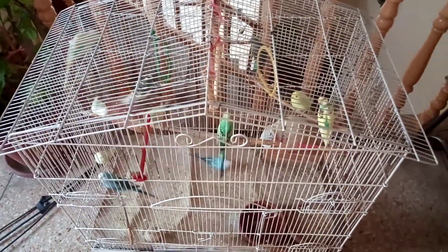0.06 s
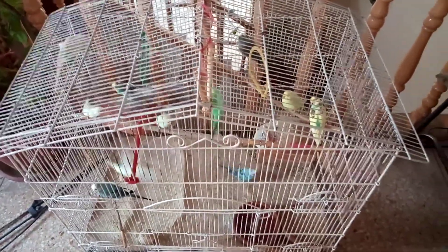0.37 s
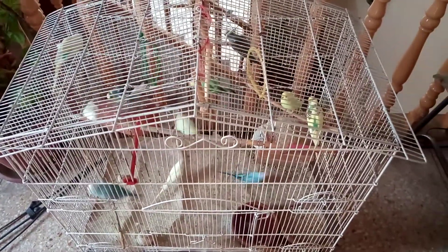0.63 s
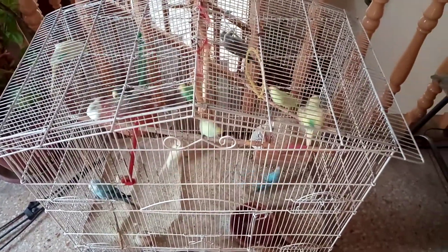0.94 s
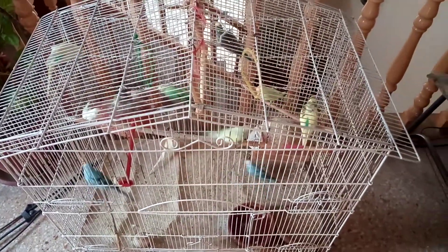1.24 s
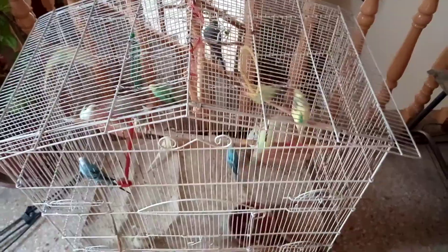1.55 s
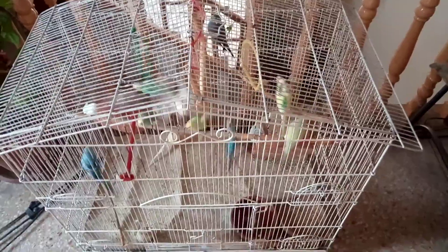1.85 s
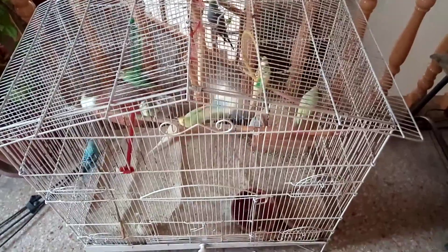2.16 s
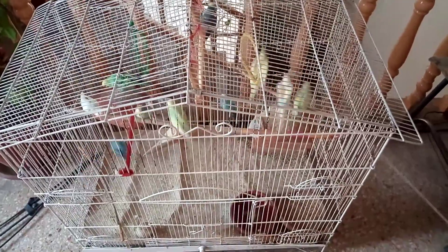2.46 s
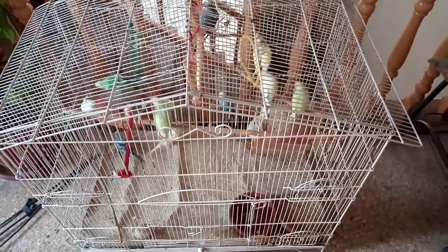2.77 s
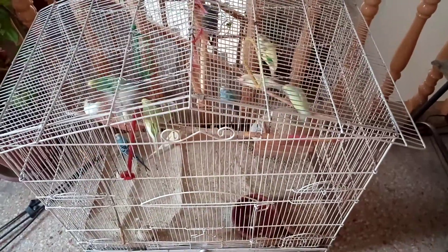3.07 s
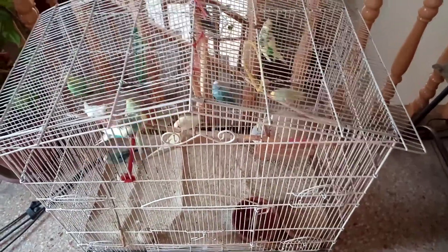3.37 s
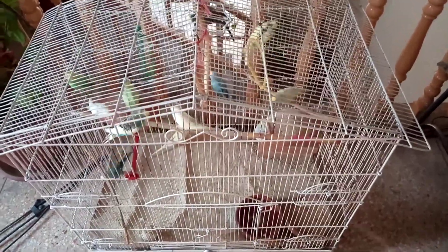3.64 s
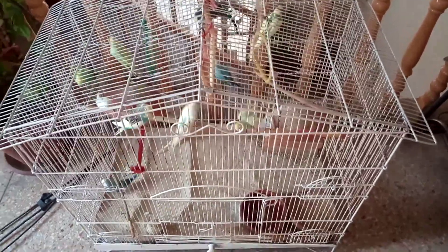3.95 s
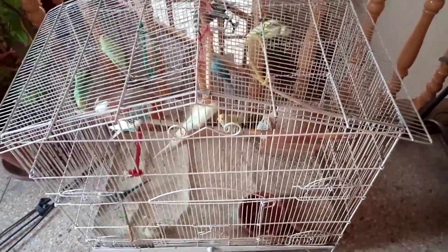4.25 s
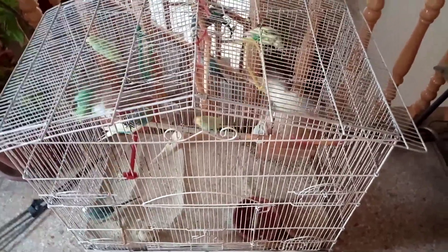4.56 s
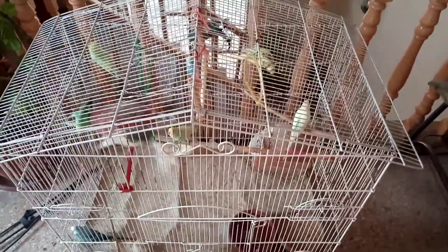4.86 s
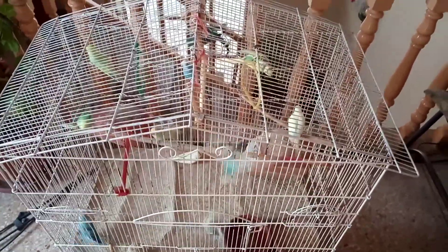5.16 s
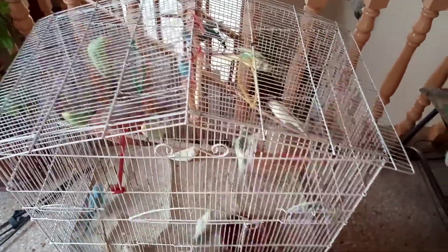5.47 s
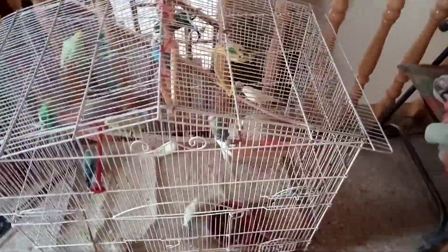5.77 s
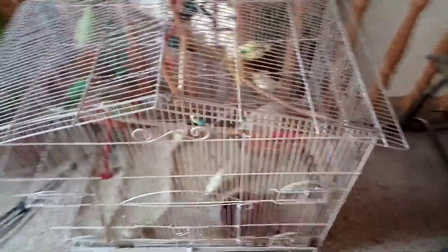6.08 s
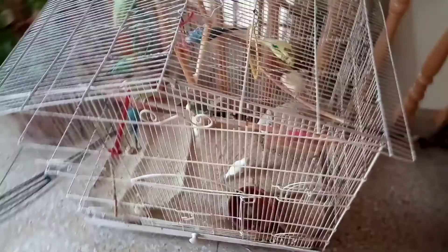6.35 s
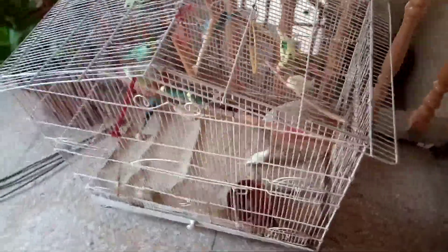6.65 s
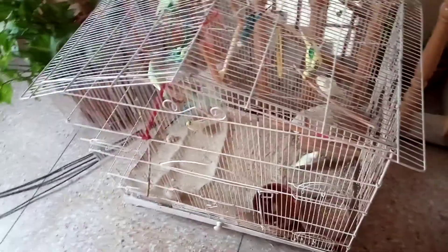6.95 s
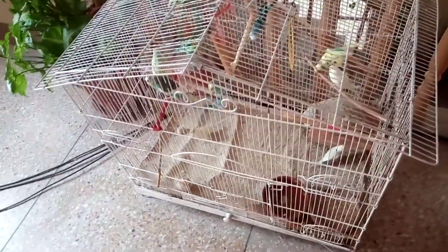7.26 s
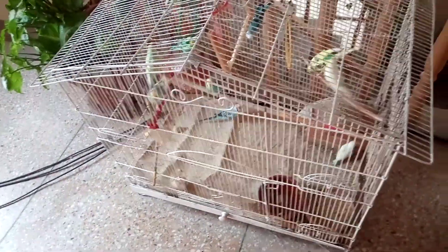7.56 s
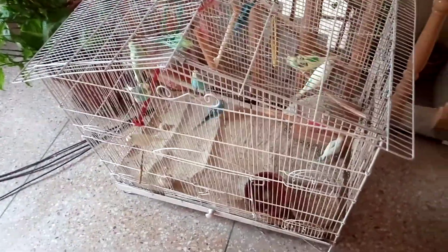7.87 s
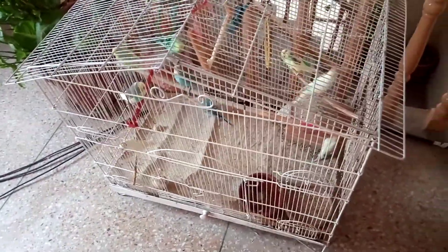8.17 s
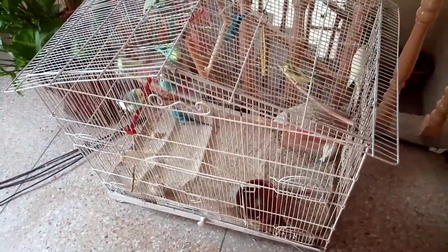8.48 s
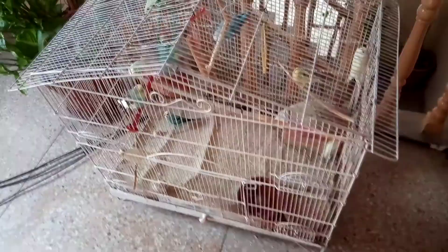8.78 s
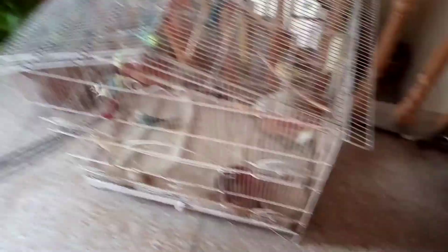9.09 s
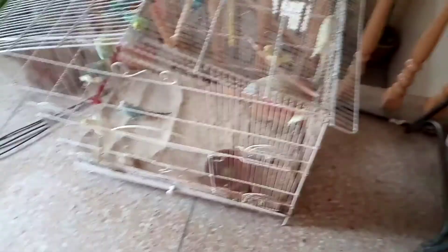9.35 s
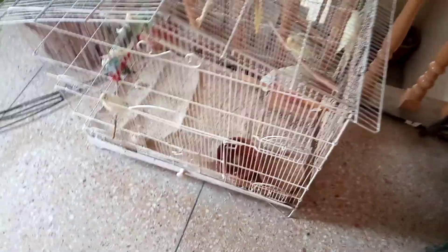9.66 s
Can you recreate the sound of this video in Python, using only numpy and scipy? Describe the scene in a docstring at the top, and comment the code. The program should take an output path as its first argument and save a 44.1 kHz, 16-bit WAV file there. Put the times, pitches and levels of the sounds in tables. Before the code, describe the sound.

Close by, a trigger spray bottle is pumped again and again, its plastic lever snapping and creaking with each short hiss of mist. Budgerigars in a wire cage give raspy chirrups, tweets and screeches and flutter their wings. About halfway, something hard clacks twice further off and the spraying stops. The birds keep calling now and then, claws ticking on the bars. Porch walls ring slightly over a faint outdoor hum.

```python
"""Budgerigars in a wire cage on a tiled porch; bare walls ring after each call, over an outdoor hum.
For the first 5 s a trigger spray bottle close by snaps, creaks and hisses mist over fluttering wings.
From 0.6 s the birds chirrup, then tweet and screech: whistles that a fluttering membrane makes rasp.
Near 5 s something hard clacks twice further off. Claws tick on the bars; rustle and background sink
around 8 s, then return as the birds call again. At 9.5 s a far bird whistles one falling note."""
import sys
import numpy as np
from scipy import signal
from scipy.fft import rfft, irfft, next_fast_len
from scipy.io import wavfile
from scipy.ndimage import uniform_filter1d, map_coordinates

SR = 44100
rng = np.random.default_rng(int(sys.argv[2]) if len(sys.argv) > 2 else 0)


def inscribe(sig):
    """Save sig as 16-bit PCM at rate SR to the path in sys.argv[1].

    A 1-D sig is mono; a 2-D sig holds one channel per row.
    Samples are clipped to [-1, 1] before scaling.
    """
    pcm = np.round(np.clip(np.atleast_2d(sig).T, -1, 1) * 32767)
    wavfile.write(sys.argv[1], SR, pcm.astype(np.int16))


N = 428652

# fine crackle of droplets, feet and feathers (frequency [Hz], density [dB])
CRACKLE_SPECTRUM = [(2940, -6.5), (5000, -6), (6170, -3), (6780, -6.5), (8320, -17.5), (11000, -2),
                    (13400, -9.5), (15200, 6), (16200, -24), (16500, -39)]


def amp(db):
    return 10 ** (np.asarray(db) / 20)


def unit(x):
    return x / np.sqrt(np.mean(x ** 2) + 1e-20)


def along(points, hz):
    """Interpolate (Hz, value) points on a log frequency axis."""
    point_hz, values = np.transpose(points)
    return np.interp(np.log(hz + 1), np.log(point_hz + 1), values)


def clock(length_s):
    return np.arange(max(int(length_s * SR), 8)) / SR


def wobble(rate_hz, size):
    """Smooth random curve, rate_hz knots a second."""
    knots = rng.standard_normal(8192)
    return map_coordinates(knots, [np.arange(size) * rate_hz / SR], mode="wrap")


def add(track, start_s, sound):
    i = round(start_s * SR)
    part = sound[max(-i, 0):max(N - i, 0)]
    track[max(i, 0):max(i, 0) + len(part)] += part


def noise(spectrum):
    """Coloured noise, rms 1."""
    size = next_fast_len(N)
    gain = amp(along(spectrum, np.fft.rfftfreq(size, 1 / SR)))
    return unit(irfft(rfft(rng.standard_normal(size)) * gain, size)[:N])


def coloured(x, spectrum, size=1024):
    """x through a minimum-phase body of unit energy."""
    cepstrum = irfft(np.log(amp(along(spectrum, np.fft.rfftfreq(size, 1 / SR)))))
    cepstrum[1:size // 2] *= 2
    cepstrum[size // 2 + 1:] = 0
    body = irfft(np.exp(rfft(cepstrum)))
    return signal.fftconvolve(x, body / np.linalg.norm(body))[:N]


def swell(t, length_s, rise_s, fall_s):
    """Rise, hold until length_s, decay."""
    attack = np.sin(np.pi / 2 * np.clip(t / rise_s, 0, 1)) ** 2
    return attack * np.exp(-np.maximum(t - length_s, 0) / fall_s)


def contour_db():
    """Slow level curve per sample, lowest around 8 s."""
    # (time [s], level [dB])
    contour = [(0, -52.5), (3.0, -56.5), (5.6, -50.5), (6.7, -52), (7.2, -54.5), (7.72, -57.5), (7.92, -68),
               (8.65, -65.5), (9.05, -57.5), (9.7, -52.5)]
    return np.interp(np.arange(N) / SR, *np.transpose(contour))


def syrinx(gesture, buzz_hz, swing_hz, overtone_db, bite_db=14):
    """A whistle that membrane flutter swings and chops into a rasp.
    Gesture rows: (time [s], pitch [Hz], level [dB], roughness [0-1])."""
    times, *curves = np.transpose(gesture)
    times = np.maximum.accumulate(times - times[0])
    t = clock(times[-1])
    hz, db, rough = (uniform_filter1d(np.interp(t, times, curve), size=128) for curve in curves)
    flutter = 2 * np.pi * np.cumsum(buzz_hz * (1 + 0.218 * wobble(220, len(t)))) / SR
    hz = hz * (1 + 0.0041 * wobble(248.7, len(t)))
    swing = np.sin(flutter) + 0.524 * wobble(1100, len(t))
    hz = np.abs(hz + rough * swing_hz * swing)
    # throat and beak resonances (frequency [Hz], gain [dB])
    throat = [(1200, -7.5), (2000, 7), (3000, 4.5), (4400, 5), (5500, -15), (6000, -7), (6550, 4.5),
              (7600, -16.5), (8900, -3.5), (10500, -17), (12300, -6), (13600, -20), (15000, 3),
              (16500, -25)]
    harmonic = np.arange(1, 6)[:, None]
    overtones_db = (harmonic > 1) * (overtone_db + bite_db * rough - 3 * (harmonic - 3))
    gain = amp(along(throat, harmonic * hz) + overtones_db)
    phase = 2 * np.pi * np.cumsum(hz) / SR
    tone = np.sum(gain * np.sin(harmonic * phase), axis=0) / np.linalg.norm(gain, axis=0)
    edges = np.clip(np.minimum(t, t[-1] - t) / 0.0016, 0, 1)
    chop = 1 + 0.56 * rough * np.cos(flutter)
    return np.sqrt(2) * amp(db) * edges * tone * chop


def chirrups():
    """A level whistle flicks up, drops into a low rasp, then swoops from the top and hooks."""
    # (start [s], whistle length [s], rasp length [s], whistle start [Hz], whistle end [Hz],
    #  whistle [dB], rasp [dB], hook [dB], overtones [dB])
    calls = [(0.597, 0.029, 0.034, 3136, 3000, -39, -45.5, -44.5, -10),
             (1.926, .037, 0.072, 2792, 3050, -20.5, -28.5, -25, -20),
             (2.673, 0.026, 0.041, 3020, 2800, -45, -45.5, -44, -8.5),
             (3.336, 0.045, 0.069, 2747, 3000, -27.5, -29.5, -27.5, -19.5),
             (4.735, 0.037, 0.077, 2850, 2950, -24.5, -29, -26, -18),
             (6.559, .035, .068, 3190, 2980, -25, -30, -26, -15.5),
             (7.569, 0.038, 0.075, 2790, 3050, -18.5, -32, -23, -23),
             (9.01, 0.033, 0.064, 3063, 2980, -28, -29.5, -28.5, -20.5)]
    out = np.zeros(N)
    for s, whistle_s, rasp_s, first_hz, last_hz, whistle_db, rasp_db, hook_db, overtone_db in calls:
        rasp_at = s + whistle_s
        hook_at = rasp_at + rasp_s
        gesture = [
            (s, first_hz, whistle_db - 13, 0),
            (s + 0.013, (first_hz + last_hz) / 2, whistle_db, 0),
            (rasp_at - 0.003, last_hz, whistle_db, 0),
            # flick
            (rasp_at, last_hz, whistle_db - 1.5, 0.05),
            (rasp_at + 0.00412, 3700, rasp_db + 5, 0.1),
            (rasp_at + 0.01074, 4700, rasp_db - 12.5, 0.3),
            (rasp_at + 0.014, 3600, rasp_db + 3.5, 1),
            # low rasp
            (rasp_at + 0.018, 2200, rasp_db - 1.5, 0.6),
            (rasp_at + 0.42 * rasp_s, 1950, rasp_db - 6, 0.8),
            (rasp_at + 0.62 * rasp_s, 1550, rasp_db - 12.5, 0.8),
            (hook_at - 0.01, 2700, rasp_db - 2, 1),
            # swoop and hook
            (hook_at, 4400, hook_db - 18.5, 0.3),
            (hook_at + 0.008, 3150, hook_db + 2, 0.1),
            (hook_at + 0.016, 2550, hook_db - 2.5, 0.1),
            (hook_at + 0.02626, 2300, hook_db - 5.5, 0.15),
            (hook_at + 0.044, 2750, hook_db, 0.3),
            (hook_at + 0.052, 2500, hook_db - 4, 0.8),
            (hook_at + 0.058, 1700, hook_db - 14.5, 0.6),
            (hook_at + 0.068, 1350, hook_db - 23, 0.3)]
        call = syrinx(gesture, buzz_hz=476.8, swing_hz=548, overtone_db=overtone_db)
        add(out, s, porch(call, wet_db=-2))
    return out


def tweets():
    """A soft pitch arch, a rough dip, then a loud arch that holds briefly and drops."""
    # (start [s], second arch start [s], top pitch [Hz], first arch [dB], second arch [dB])
    calls = [(1.488, 1.548, 3305, -31.5, -21.5), (3.882, 3.945, 3303, -31, -22),
             (6.166, 6.23, 3218, -39.5, -22), (9.272, 9.341, 3262, -35.5, -23.5)]
    out = np.zeros(N)
    for s, second_at, top_hz, first_db, second_db in calls:
        gesture = [
            (s, 0.87 * top_hz, first_db - 6, 0),
            (s + 0.0148, top_hz, first_db - 7.5, 0),
            (s + 0.029, top_hz, first_db - 8, 0),
            (s + 0.032, top_hz, first_db + 4.5, 0.05),
            (s + 0.043, 0.75 * top_hz, first_db - 5, 0.4),
            (second_at - 0.01, 0.51 * top_hz, first_db - 8, 1),
            (second_at, 0.88 * top_hz, second_db - 6.5, 0.1),
            (second_at + 0.0117, top_hz, second_db - 1.5, 0.05),
            (second_at + 0.02007, 0.9 * top_hz, second_db, 0.1),
            (second_at + 0.0386, 0.86 * top_hz, second_db, 0.18),
            (second_at + 0.051, 0.84 * top_hz, second_db - 23, 0.2),
            (second_at + 0.051, 0.67 * top_hz, second_db - 5, 0.05),
            (second_at + 0.066, 0.653 * top_hz, second_db - 17.5, 0.05)]
        call = syrinx(gesture, buzz_hz=450, swing_hz=544, overtone_db=-22)
        add(out, s, porch(call, wet_db=-2.5))
    return out


def screeches():
    """A rising whistle breaks into a buzz that surges twice and fades."""
    # (start [s], length [s], pitch [Hz], level [dB])
    calls = [(1.751, 0.129, 3408, -21), (4.533, 0.156, 3376, -22.5)]
    out = np.zeros(N)
    for s, length_s, hz, db in calls:
        gesture = [
            (s, 0.8 * hz, db - 7, 0),
            (s + 0.01217, 0.88 * hz, db, 0.05),
            (s + 0.029, hz, db + 2.5, 0.15),
            (s + 0.042, 0.88 * hz, db - 5, 1),
            (s + 0.064, 1.02 * hz, db + 2.5, 0.35),
            (s + 0.083, 0.96 * hz, db - 14.5, 0.9),
            (s + 0.108, 0.98 * hz, db + 3.5, 0.35),
            (s + length_s, 1.1 * hz, db - 41, 0.8)]
        call = syrinx(gesture, buzz_hz=423, swing_hz=685, overtone_db=-22, bite_db=7.5)
        add(out, s, porch(call, wet_db=-3))
    return out


def spray():
    """Each pump builds a jet of mist that stops short; droplets patter on after it."""
    # trigger pumps (start [s], length [s], level [dB])
    pumps = [(-.04, 0.1, -35), (0.216, 0.079, -31), (0.483, 0.09, -32), (0.768, 0.086, -33.5),
             (1.988, 0.098, -34.5), (2.42, 0.11, -35.5), (2.825, 0.14, -35), (3.289, 0.098, -31),
             (3.647, 0.14, -31.5), (4.013, 0.11, -29), (4.326, 0.11, -31), (4.701, 0.22, -35.5),
             (5.058, 0.12, -34)]
    # jet, nozzle resonance near 5 kHz (frequency [Hz], density [dB])
    jet_spectrum = [(800, -40), (1500, -16), (3000, -11.5), (4000, -11.5), (4650, 0), (5300, -.5),
                    (5900, -7.5), (6600, -4.5), (8100, -17), (9600, -5), (11500, -0.5), (13600, -2),
                    (15200, 10), (16000, -15), (16500, -47)]
    jet, patter = np.zeros(N), np.zeros(N)
    for s, length_s, db in pumps:
        t = clock(length_s + 0.6)
        add(jet, s, amp(db) * swell(t, 0.77 * length_s, rise_s=0.031, fall_s=0.024))
        add(patter, s, amp(db - 5.5) * swell(t, length_s, rise_s=0.23, fall_s=0.084))
    sputter = amp(1.3 * wobble(130, N) + 1.2 * wobble(900, N))
    droplets = unit(amp(3.6 * wobble(800, N)))
    mist = jet * sputter * noise(jet_spectrum) + patter * droplets * noise(CRACKLE_SPECTRUM)
    return porch(mist, wet_db=-15)[:N]


def trigger(slip_hz=440):
    """The plastic lever snaps close by; its piston creaks by stick-slip."""
    # lever snaps (time [s], relative level [dB])
    lever_snaps = [(0.174, -12), (0.2221, -9), (0.49, -16), (0.7535, -12.5), (2.418, -9.5), (2.819, -12.5),
                   (3.6406, -20), (3.8412, -23), (4, -16), (4.3246, -16.5), (4.6932, -14.5)]
    # piston creaks (start [s], length [s], relative level [dB])
    piston_creaks = [(0.046, 0.029, -32), (0.189, 0.03, -28.5), (.955, .035, -43), (2.03, 0.03, -41),
                     (2.644, 0.046, -38), (3.039, 0.043, -36), (3.479, 0.02, -32.5), (3.856, 0.034, -27)]
    # resonances of each part (frequency [Hz], gain [dB])
    lever_body = [(300, -17), (2000, -16), (4800, -3), (6500, -1), (8000, -13), (11000, 2.5), (15000, 4),
                  (16800, -6.5)]
    piston_body = [(300, -41), (2500, -19), (4800, -14), (8000, -14), (11000, -1.5), (15200, -1),
                   (16000, -5), (16600, -34)]
    snaps, creaks = np.zeros(N), np.zeros(N)
    t = clock(0.02)
    decay = np.exp(-t / 0.0006) + 0.088 * np.exp(-t / 0.0073)
    for s, db in lever_snaps:
        add(snaps, s + 0.00077, amp(db - 22.5) * unit(rng.standard_normal(len(t)) * decay))
    for s, length_s, db in piston_creaks:
        t = clock(length_s)
        cycles = np.cumsum(slip_hz * (1 + 0.06 * wobble(90, len(t)))) / SR
        slips = np.diff(np.floor(cycles), prepend=0)
        strength = np.sin(np.pi * t / length_s) * amp(4.8 * wobble(270, len(t)))
        add(creaks, s, amp(db - 7) * unit(slips * strength))
    return porch(coloured(snaps, lever_body) + coloured(creaks, piston_body), wet_db=-12)[:N]


def wings(beat_hz=21):
    """Each downstroke pushes air and rustles feathers; landings bump the cage."""
    # wingbeat bursts (start [s], length [s], air [dB], rustle [dB])
    flutters = [(-.06, 0.17, -52, -44.5), (0.279, 0.092, -54, -44.5), (0.437, 0.16, -47, -59),
                (1.716, 0.11, -42, -51), (1.893, 0.21, -46, -47), (2.046, 0.21, -40, -62),
                (2.897, 0.041, -63, -36.5), (3.098, 0.31, -52, -66), (5.016, 0.24, -38, -56),
                (5.219, 0.2, -49.5, -56), (6.258, 0.21, -50, -50.5), (8.692, 0.13, -47, -56.5),
                (9.212, 0.11, -50, -51)]
    # soft bumps (time [s], pitch [Hz], level [dB])
    landings = [(1.679, 70, -31), (1.729, 126, -25.5), (1.764, 434, -27.5), (2.085, 390, -20.5),
                (3.119, 129, -31), (4.943, 390, -28), (7.251, 129, -32)]
    # pushed air and feather rustle (frequency [Hz], density [dB])
    push_spectrum = [(30, -29), (70, 0.5), (160, 5.5), (400, 3), (650, -6), (1500, -15), (5000, -30),
                     (15000, -39)]
    rustle_spectrum = [(300, -9), (1200, -1.5), (2300, -0.5), (4000, 3), (6200, 3.5), (7800, -8),
                       (12000, -3), (15800, 2), (16500, -35)]
    push, rustle, bumps = np.zeros((3, N))
    for s, length_s, air_db, rustle_db in flutters:
        t = clock(length_s)
        arch = np.abs(np.sin(np.pi * t / length_s)) ** 0.5
        beats = unit(amp(3.8 * np.sin(2 * np.pi * beat_hz * t)) * arch)
        add(push, s, amp(air_db) * beats)
        add(rustle, s, amp(rustle_db) * beats)
    t = clock(0.15)
    impact = swell(t, 0.0026, rise_s=0.0038, fall_s=0.0046)
    for s, hz, db in landings:
        add(bumps, s, amp(db) * np.sin(2 * np.pi * hz * t) * impact)
    return porch(push * noise(push_spectrum) + rustle * noise(rustle_spectrum) + bumps, wet_db=-4)[:N]


def cage_ticks(faint_count=45):
    """Claws and beaks strike the bars: clear ticks, and faint random ones along the level contour."""
    # strikes (time [s], relative level [dB])
    clear_ticks = [(0.7026, -28.5), (0.8781, -35), (0.9733, -28.5), (2.9434, -42), (3.2512, -26.5),
                   (4.2183, -37), (5.027, -31), (5.0634, -28), (5.251, -27.5), (5.3079, -21),
                   (5.649, -33.5), (6.327, -29), (7.0873, -42), (7.2901, -31.5), (7.4745, -30),
                   (8.1589, -41), (8.2317, -38.5), (8.4331, -39), (8.7136, -33)]
    # wire bar resonances (frequency [Hz], gain [dB])
    bars = [(200, -1), (1200, 5), (2500, -4), (5000, 0), (8000, -6.5), (12000, 1), (15500, 2), (16700, -25)]
    force, t = np.zeros(N), clock(0.052)
    decay = np.exp(-t / 0.0028) + 0.37 * np.exp(-t / 0.012)
    faint_samples = rng.integers(N, size=faint_count)
    faint_db = contour_db()[faint_samples] + 12 + 3 * rng.standard_normal(faint_count)
    for s, db in [*clear_ticks, *zip(faint_samples / SR, faint_db)]:
        add(force, s, amp(db - 18.5) * unit(rng.standard_normal(len(t)) * decay))
    return porch(coloured(force, bars), wet_db=-4.5)[:N]


def scrabbling(rise_s=0.016, fall_s=0.039):
    """Feet and feathers keep up a fine crackle, louder when a bird climbs."""
    # climbing bouts (start [s], length [s], relative level [dB])
    bouts = [(.34, 0.064, -42), (0.897, .24, -45), (1.326, 0.051, -45), (1.697, 0.22, -44),
             (2.562, 0.085, -40.5), (4.48, 0.1, -38), (4.856, 0.044, -42), (5.296, 0.039, -50),
             (7.5, 0.2, -60), (8.323, 0.13, -50)]
    effort = amp(contour_db() - 1)
    for s, length_s, db in bouts:
        add(effort, s, amp(db - 8) * swell(clock(length_s + 6 * fall_s), length_s, rise_s, fall_s))
    grain = amp(2.1 * wobble(35, N) + 2.5 * wobble(450, N))
    return effort * unit(grain * noise(CRACKLE_SPECTRUM))


def clacks():
    """Hard knocks some way off, answered by the walls."""
    # (time [s], level [dB])
    knocks = [(4.788, -26), (5.029, -40.5)]
    # struck object (frequency [Hz], density [dB])
    knock_spectrum = [(200, -14), (550, -2), (850, 7.5), (1300, 4), (1900, 2), (4000, -1), (6500, -3.5),
                      (9000, -20), (15000, -29)]
    blows, t = np.zeros(N), clock(0.4)
    for s, db in knocks:
        add(blows, s, amp(db) * swell(t, 0.0053, rise_s=0.002, fall_s=0.052))
    return porch(blows * noise(knock_spectrum), wet_db=-3)[:N]


def far_bird():
    """One thin, distant falling whistle."""
    # (time [s], pitch [Hz], level [dB], roughness [0-1])
    gesture = [(9.498, 1610, -63, 0.1), (9.56, 1530, -48, 0), (9.621, 1395, -61, 0), (9.68, 1330, -50, 0.1)]
    out = np.zeros(N)
    call = syrinx(gesture, buzz_hz=0, swing_hz=0, overtone_db=-27)
    add(out, gesture[0][0], porch(call, wet_db=-5))
    return out


def draughts():
    """Stirred air rumbles on the microphone."""
    # (start [s], length [s], level [dB])
    puffs = [(1.658, 0.39, -50), (2.10, 0.36, -58), (3.118, 0.17, -52), (5.077, 0.36, -55),
             (5.816, 0.82, -58.5), (8.715, 0.12, -50), (9.23, 0.082, -52)]
    # air rumble (frequency [Hz], density [dB])
    rumble_spectrum = [(20, -26), (38, -8), (50, 7), (75, 3), (120, -6), (250, -16), (800, -55),
                       (4000, -110)]
    flow = np.zeros(N)
    for s, length_s, db in puffs:
        add(flow, s, amp(db) * swell(clock(2 * length_s), length_s, rise_s=0.026, fall_s=0.02))
    return flow * amp(1.3 * wobble(24, N)) * noise(rumble_spectrum)


def surroundings():
    """Outdoor hum, murk and hiss; the hiss and murk sink slightly around 8 s, then return."""
    # wavering hum (frequency [Hz], level [dB])
    hum_tones = [(56.5, -69.5), (100, -64), (149, -65.5), (200, -60), (225, -70), (437, -64.5)]
    # outdoor noise (frequency [Hz], density [dB])
    murk_spectrum = [(15, -51), (25, -40), (40, -23), (69, -21), (96, -0.5), (144, -8), (168, 0),
                     (198, 4.5), (248, 1), (366, 0.5), (389, 3), (565, -8.5), (900, -14.5), (1170, -49),
                     (1980, -120)]
    hiss_spectrum = [(290, -10), (500, 2.5), (1150, 7), (2010, -3), (2920, -5.5), (3180, -11),
                     (4410, -17.5), (6110, -13), (6900, -39), (9000, -46.5), (11700, -57), (19800, -120)]
    t = np.arange(N) / SR
    offset_db = contour_db() - contour_db().mean()
    drift_rad = 1.13 * wobble(7, N)
    hum = sum(amp(db + 4.5 * wobble(4.6, N)) * np.sqrt(2) * np.sin(2 * np.pi * hz * t + drift_rad)
              for hz, db in hum_tones)
    murk = amp(-49.5 + 0.14 * offset_db + 1.6 * wobble(13, N)) * noise(murk_spectrum)
    hiss = amp(-53 + 0.11 * offset_db + 3 * wobble(15, N)) * noise(hiss_spectrum)
    return hum + murk + hiss


def porch(x, wet_db, early_db=-7):
    """Direct sound, eight near reflections and the tail of the walls."""
    # wall reverberation (frequency [Hz], T60 [s])
    walls = [(150, 0.71), (1000, 0.68), (2800, 0.68), (6000, 0.63), (10000, 0.33), (16000, 0.28)]
    hz, t, bins = signal.stft(rng.standard_normal(int(SR * 0.8)), SR, nperseg=256)
    decay = amp(-60 * t / along(walls, hz)[:, None])
    tail = signal.istft(bins * decay, SR, nperseg=256)[1]
    tail *= np.clip(np.arange(len(tail)) / SR / 0.0046, 0, 1)
    response = amp(wet_db) * tail / np.linalg.norm(tail)
    taps = (rng.uniform(0.002014, 0.025, size=8) * SR).astype(int)
    response[taps] += amp(wet_db + early_db) * unit(rng.standard_normal(len(taps))) / np.sqrt(len(taps))
    response[0] = 1
    return signal.fftconvolve(x, response)


def scene():
    """All sources at one microphone, the same in both channels."""
    birds = chirrups() + tweets() + screeches() + far_bird() + wings() + cage_ticks() + scrabbling()
    mono = birds + spray() + trigger() + clacks() + draughts() + surroundings()
    return np.array([mono, mono])


def record(dry, low_cut_hz=42, top_hz=16900):
    """The level dips briefly twice; deepest bass and highest treble are cut."""
    # level dips (time [s], half width [s])
    dips = [(.872, 0.0037), (2.062, 0.0041)]
    t = np.arange(N) / SR
    gain = np.prod([1 - 0.9 * np.exp(-((t - s) / half_s) ** 4) for s, half_s in dips], axis=0)
    size = next_fast_len(N + SR // 2)
    hz = np.fft.rfftfreq(size, 1 / SR)
    band = hz ** 2 / np.hypot(hz ** 2, low_cut_hz ** 2) * (hz < top_hz)
    return irfft(rfft(dry * gain, size) * band, size)[:, :N]


dry = scene()
out = record(dry)
inscribe(out)
```